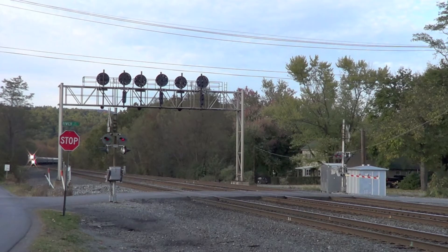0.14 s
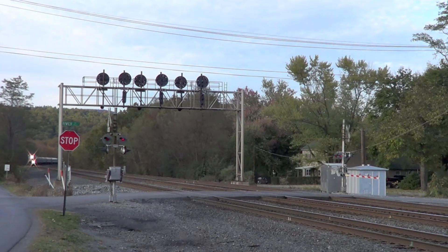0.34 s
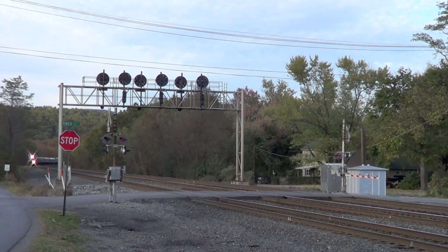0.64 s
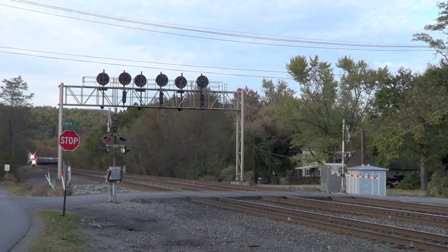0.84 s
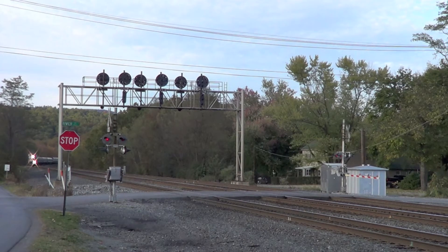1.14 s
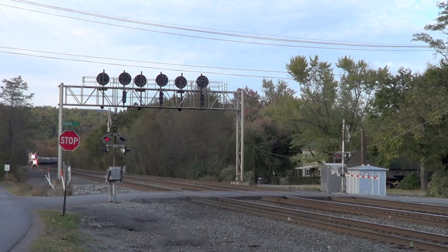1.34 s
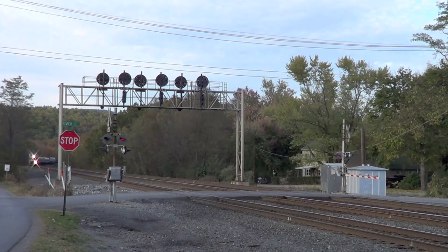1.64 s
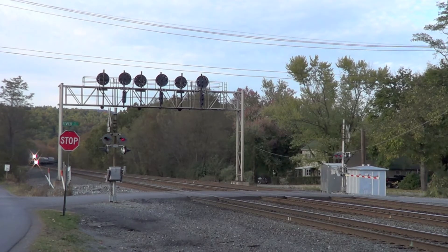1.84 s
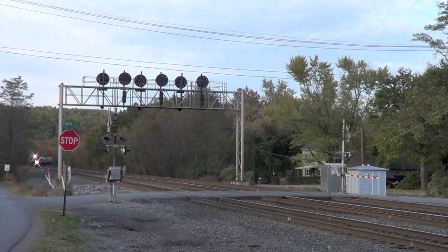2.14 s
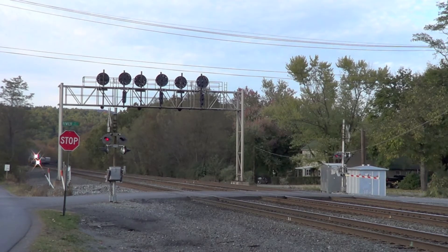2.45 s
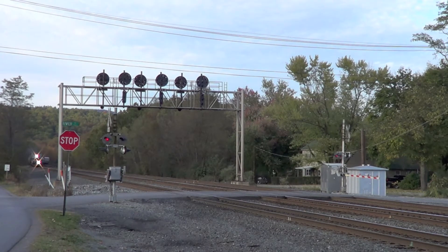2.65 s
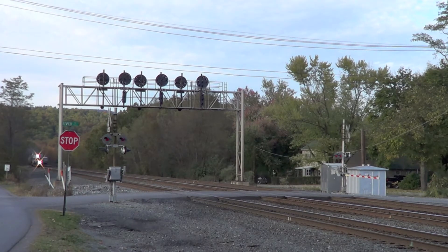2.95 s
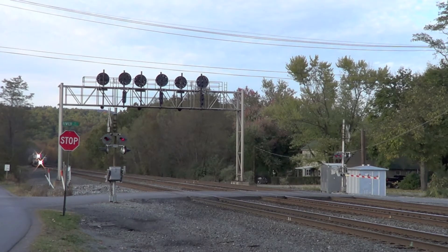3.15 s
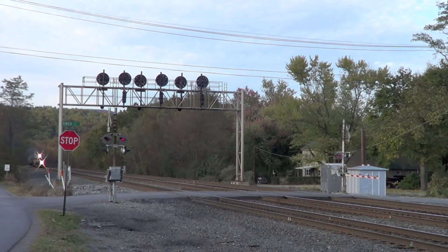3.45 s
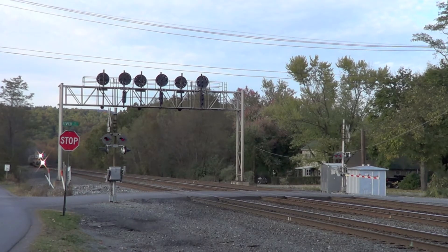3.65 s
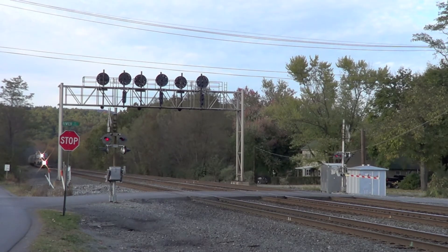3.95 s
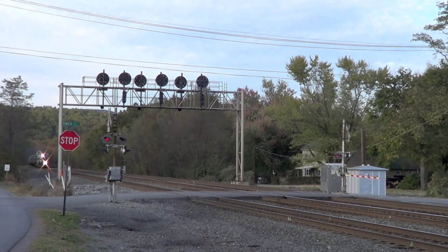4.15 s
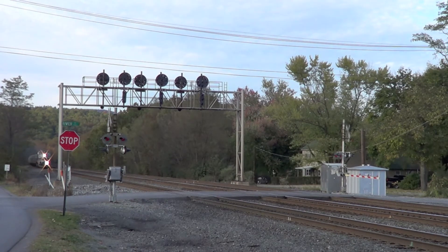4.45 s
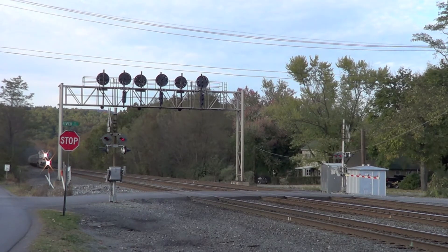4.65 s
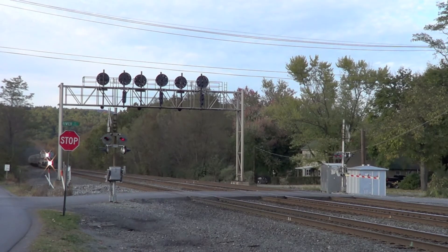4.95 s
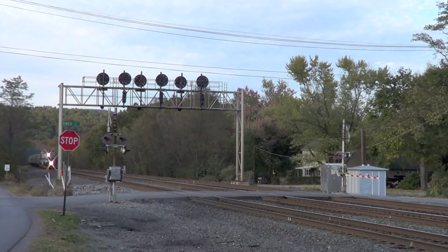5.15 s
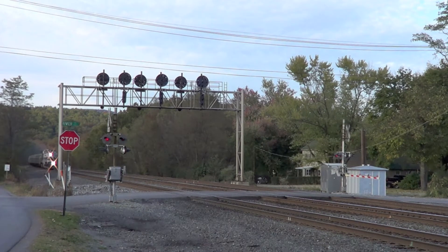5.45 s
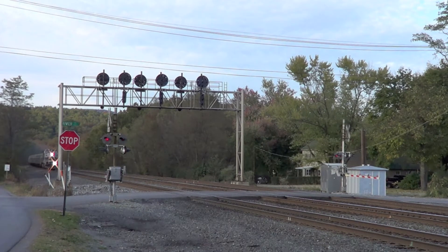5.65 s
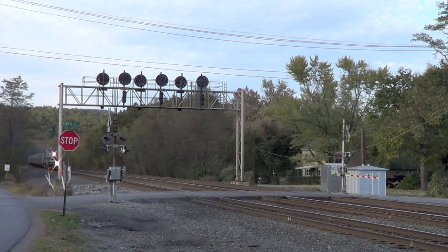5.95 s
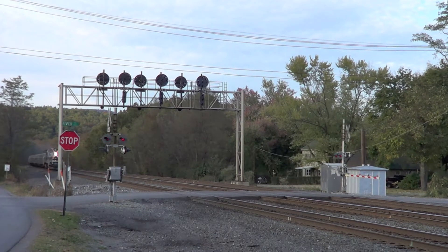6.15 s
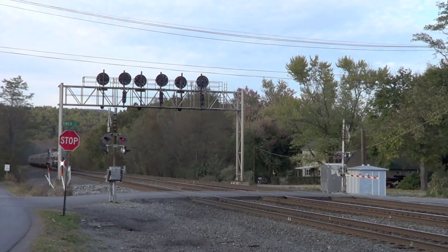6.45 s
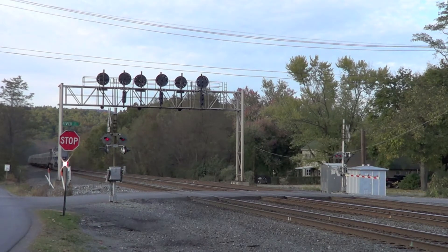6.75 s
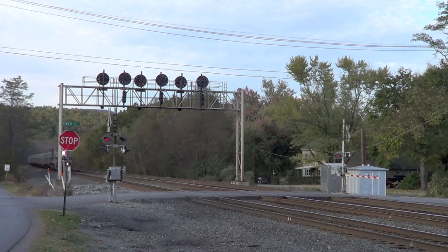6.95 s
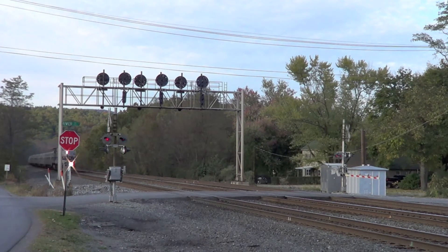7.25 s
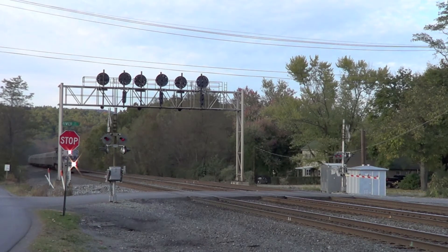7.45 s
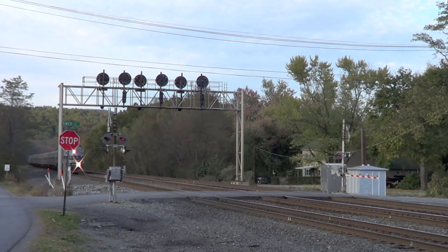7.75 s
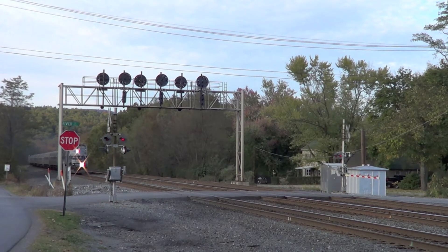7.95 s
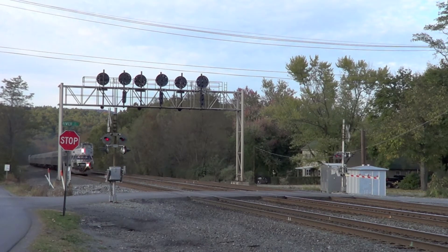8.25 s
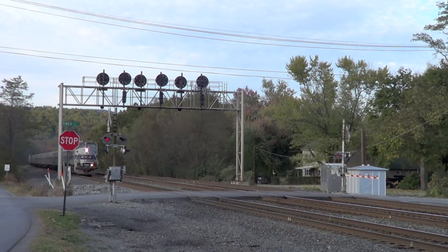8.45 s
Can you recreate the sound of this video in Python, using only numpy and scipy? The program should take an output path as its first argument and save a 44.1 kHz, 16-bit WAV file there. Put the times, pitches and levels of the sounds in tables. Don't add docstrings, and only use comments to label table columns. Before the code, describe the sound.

A diesel locomotive's throbbing low drone swells steadily at a rural crossing, rails hissing faintly, until a chordal horn bursts in at the very end.

```python
import sys
import numpy as np
from scipy import signal
from scipy.fft import rfft, irfft, next_fast_len
from scipy.io import wavfile
from scipy.ndimage import uniform_filter1d

SR = 44100
rng = np.random.default_rng(int(sys.argv[2]) if len(sys.argv) > 2 else 0)


def ratio(d):
    e = np.asarray(d, float) / 20
    return 10 ** e


def wrap_up_sound(samples):
    columns = np.atleast_2d(samples).T
    tamed = np.clip(columns, -1, 1)
    steps = np.round(tamed * 32767).astype(np.int16)
    wavfile.write(sys.argv[1], SR, steps)


N = 378819
T = np.arange(N) / SR
SIZE = next_fast_len(N + SR // 2)
HZ = np.maximum(np.arange(SIZE // 2 + 1) * SR / SIZE, 1)


def set_level(x, db):
    return x * ratio(db) / np.sqrt(np.mean(x ** 2))


def curve(table):
    s, values = np.transpose(table)
    return np.interp(T, s, values)


def along(table, hz):
    f, values = np.transpose(table)
    return np.interp(np.log(hz), np.log(f), values)


def ring(x, hz, width_hz):
    return signal.lfilter(*signal.iirpeak(hz, hz / width_hz, SR), x)


def steep_ring(x, hz, width_hz):
    return ring(ring(x, hz, width_hz), hz, width_hz)


def burst(x, s, length, db, hz, width_hz):
    out = np.zeros(x.shape)
    part = slice(max(int((s - 3 * length) * SR), 0), int((s + 3 * length) * SR))
    swell = np.exp(-((T[part] - s) / length) ** 2)
    out[..., part] = set_level(steep_ring(x[..., part], hz, width_hz), db) * swell
    return out


def walk(rate, t=T):
    steps = rng.standard_normal(int((t[-1] - t[0]) * rate) + 3)
    steps = uniform_filter1d(steps, size=2)
    return 1.62 * np.interp((t - t[0]) * rate, np.arange(len(steps)), steps)


def wash(colour, db, flicker_db, move):
    # (frequency [Hz], side share [0-1])
    spread = [(25, 0.7), (60, 0.5), (300, 0.61), (700, 0.49), (1500, 0.34), (3000, 0.19), (5000, 0.65),
              (9000, 0.49), (10500, 0.2), (12000, 0.05)]
    hz, s, noise = signal.stft(rng.standard_normal((2, N)), SR, nperseg=4096)
    hz = np.maximum(hz, 1)
    at = np.minimum(s * SR, N - 1).astype(int)
    shape = ratio(along(colour, hz)) * (hz > colour[0][0]) * (hz < colour[-1][0])
    shape = shape / np.sqrt(np.mean(shape ** 2))
    centres = 2 ** np.arange(4, 14.6, .5)
    window = np.clip(1 - 2 * abs(np.log2(hz[:, None] / centres)), 0, 1)
    swell_db = window @ np.array([flicker_db * walk(6.6, s) + move(f)[at] for f in centres])
    mid, side = noise * shape[:, None] * ratio(db + swell_db)
    side = side * np.clip(along(spread, hz), 0, 1)[:, None]
    return signal.istft(np.array([mid + side, mid - side]), SR, nperseg=4096)[1][:, :N]


def camcorder(scatter_db=4, late=.5, hum=0.31):
    # (frequency [Hz], width [Hz], level [dB])
    buzz = [(4070, 200, -68), (6740, 830, -70), (10370, 250, -74.5), (12360, 1100, -64)]
    # (frequency [Hz], level [dB])
    whine = [(15734.3, -64), (15747.4, -69), (7882, -79)]
    field = T * 59.94 + late
    spit_size = ratio(scatter_db * rng.uniform(-1.8, 2.1, int(field[-1]) + 1))[field.astype(int)]
    first = np.exp(-((field % 1 - .03) / 0.046) ** 2)
    second = .5 * np.exp(-((field % 1 - .23) / .04) ** 2)
    spit = (spit_size * (first + second) + hum) * rng.standard_normal(N)
    out = sum(set_level(steep_ring(spit, hz, width), db) for hz, width, db in buzz)
    blank = 1 - .35 * (field % 1 > .9)
    return out + blank * sum(np.sqrt(2) * ratio(db) * np.sin(2 * np.pi * hz * T) for hz, db in whine)


def wind(low_hz=38, top_hz=190):
    # (time [s], length [s], level [dB], centre [Hz])
    puffs = [
        (3.5, 0.065, -32, 55),
        (3.95, .08, -40, 50),
        (4.067, 0.048, -27.5, 80),
        (4.28, 0.026, -23, 100),
        (5.58, .08, -31, 65),
        (6.38, 0.078, -35, 55),
        (6.6, 0.11, -28, 70),
        (6.8, .07, -29, 85),
        (7.65, .08, -36, 50),
        (8.15, .08, -35, 55),
    ]
    band = signal.butter(3, [low_hz, top_hz], "band", fs=SR, output="sos")
    swirl = signal.sosfilt(band, rng.standard_normal((2, N)))
    left, right = sum(burst(swirl, s, length, db, hz, 2.8 * hz) for s, length, db, hz in puffs)
    return np.array([left, 0.54 * right - 1.0 * left])


def countryside():
    # (frequency [Hz], level [dB per Hz])
    field_colour = [(130, -40), (220, -13.5), (300, -7.5), (370, -8), (480, -7.5), (610, -0.5), (800, -3),
                    (1120, -6.5), (1600, -14), (3000, -23.5), (4300, -26), (5400, -29.5), (10900, -31),
                    (14000, -32.5), (15900, -27)]
    # (time [s], length [s], level [dB], pitch [Hz], chirp rate [per s])
    crickets = [
        (0.603, 1, -65, 3450, 19.2),
        (1.42, 0.2, -58, 3290, 24.3),
        (1.68, .08, -57.5, 3320, 20),
        (1.88, 0.26, -58, 3480, 13.3),
        (2.004, 0.43, -62, 3730, 16),
        (2.8, 0.73, -63, 3530, 18),
        (4.0, 0.41, -60, 3540, 15.7),
        (1.15, .25, -64, 4070, 19),
        (2.2, .3, -65, 4080, 20),
        (4.103, .2, -69, 4040, 19),
    ]
    # (time [s], length [s], level [dB], centre [Hz], width [Hz])
    rustles = [(0.044, 0.003, -45, 5900, 2000), (0.044, 0.0036, -42.5, 2140, 700),
               (0.042, 0.0022, -48, 8600, 1500), (0.06, 0.069, -52, 8900, 6000),
               (.16, 0.0018, -50, 5900, 2500), (.193, 0.0022, -50, 4000, 3000),
               (.24, .012, -54, 5000, 5000), (1.032, 0.17, -60, 7000, 7000),
               (1.65, 0.069, -56.5, 8500, 6000), (1.66, .04, -57, 4200, 2500),
               (1.978, .015, -57, 5000, 5000), (4.754, .008, -54, 9800, 2000),
               (5.54, .008, -70, 10500, 2000)]
    car_db = 5 * np.exp(-T / 2.4)
    traffic_db, leaves_db = -45.5 + car_db, -43.5 + 0.54 * car_db
    out = wash(field_colour, 0, 0.98, lambda hz: traffic_db if hz < 3000 else leaves_db)
    wing = rng.standard_normal((2, N))
    for s, length, db, hz, rate in crickets:
        strokes = 0.62 + np.cos(np.pi * rate * (T - s)) ** 4
        out = out + burst(wing * strokes, s, length, db, hz, 190)
    grit = rng.standard_normal(N) * ratio(2.6 * rng.exponential(size=N))
    return out + sum(burst(grit, *row) for row in rustles)


def horn(flutter_db=2.5, sag_hz=15, fall_db=-18, echo_db=-9, echo_s=.06, wide=.4):
    # (pitch [Hz], air arrives [s], rise [s], level [dB], second tone over the first [dB])
    bells = [
        (341, 8.405, 0.05, -22.5, -16),
        (412, 8.40, .17, -25, -4),
        (462, 8.47, 0.062, -21, -18),
        (560, 8.43, .09, -22.5, -14),
        (590, 8.43, 0.051, -28, -13),
        (652, 8.47, 0.098, -30, -15),
    ]
    third_db = -7
    speak = (1.4, 2.3, 0.49)
    count = SR // 4
    t, out = T[-count:], 0
    for hz, start, rise, bell_db, brass_db in bells:
        air = np.clip((t - start) / rise, 0, 1)
        phase = 2 * np.pi * np.cumsum(hz - sag_hz * (t - start) + 5 * walk(39.5, t)) / SR
        for k in range(1, 6):
            kind = min(k, 3) - 1
            db = bell_db + (0, brass_db, brass_db + third_db)[kind]
            db = db + fall_db * np.log2(max(k / 3, 1)) + flutter_db * walk(44.5, t)
            out = out + np.sqrt(2) * air ** speak[kind] * ratio(db) * np.sin(k * phase + 6 * rng.random())
    rasp = steep_ring(rng.standard_normal(count), 1700, 2400)
    out = out + air * set_level(rasp, -42.5)
    mid, side = rng.standard_normal((2, count)) * np.exp(-T[:count] / echo_s)
    tail = np.array([mid + wide * side, mid - wide * side]) / np.sqrt(np.sum(mid ** 2))
    heard = out + ratio(echo_db) * signal.fftconvolve(out[None], tail, axes=1)[:, :count]
    return np.pad(heard, ((0, 0), (N - count, 0)))


def machinery(near_db):
    # (frequency [Hz], level [dB per Hz])
    rumble_colour = [(22, -19), (35, -10.5), (60, -4.5), (100, -1), (150, -5), (220, -10.5), (290, -11),
                     (380, -15.5), (700, -24.5)]
    # (frequency [Hz], level [dB per Hz])
    roar_colour = [(180, -25), (300, 0), (318, -11), (356, -5.5), (515, -6), (647, -4.5), (1130, -10.5),
                   (1340, -8.5), (2230, -8.5), (3520, -18), (4360, -27.5), (6040, -31.5), (9000, -50),
                   (11700, -80), (19800, -120)]
    # (time [s], length [s], level [dB], pitch [Hz], width [Hz])
    rails = [
        (6.04, .05, -48, 2200, 400),
        (6.42, 0.2, -44, 1920, 110),
        (6.45, 0.15, -44.5, 2354, 220),
        (6.36, .09, -46, 2700, 900),
        (6.75, 0.099, -46, 1930, 130),
        (6.9, .04, -50, 2350, 150),
        (5.43, .3, -49, 1930, 640),
        (4.15, .15, -53, 2200, 1100),
    ]
    left_s = T[-1] - T
    trees_db = 5.5 * np.clip((4.65 - T) / 2.17, 0, 1)
    bush_db = 1 * (T < 5.8)
    roar_db = -36.5 - 2.0 * left_s - trees_db - bush_db
    top_db = np.maximum(2.5 - 1.5 * left_s, -2.5)

    def reach(hz):
        treble_db = top_db * np.clip(np.log2(hz / 2500), 0, 2)
        return roar_db + treble_db + (roar_db + 43.0) * 0.23 * np.log2(hz / 2000)

    rumble = wash(rumble_colour, -16, 1.55, lambda hz: -20 + 0.63 * (near_db + 20))
    scrub = rng.standard_normal(N)
    return rumble + wash(roar_colour, 3.2, 0.59, reach) + sum(burst(scrub, *row) for row in rails)


def exhaust(near_db, bark_db, usual_db=-20.5, usual_bark_db=-16.5, scatter_db=.45, jitter_s=.00006):
    # (time [s], firing rate [per s])
    firing = [(0.0, 98.43), (1.5, 96.59), (3.0, 96.87), (4.5, 96.46), (6.0, 96.15), (7.3, 96.27),
              (8.59, 95.9)]
    # (blow [dB], lag [crank degrees])
    cylinders = [(-2.8, -12.1), (-6.4, -23.5), (-2.6, -7.2), (3.9, -19.9), (-1.1, -18.0), (4.5, -12.9),
                 (1.3, -2.0), (5.9, -19.0), (-2.1, -6.5), (-3.4, -10.0), (-2.0, -2.8), (4.8, -22.9)]
    # (frequency [Hz], width [Hz], level [dB])
    stack = [(43.6, 8.0, -5.5), (64.8, 8.0, -21.5), (89.3, 21.5, -1.1), (108.0, 9.6, 6.2),
             (144.8, 8.0, -26.1), (188.5, 21.4, -9.9), (211.6, 8.0, -2.4), (237.4, 8.0, -18.1),
             (281.9, 8.0, -22.9)]
    # (frequency [Hz], dB per dB)
    growth = [(48, 0.56), (96, 1.12), (140, 1.02), (190, 1.0), (220, 1.15), (290, 1.1)]
    count, early = len(cylinders), SR // 4
    rate = np.r_[np.full(early, firing[0][1]), curve(firing)]
    turn = (np.cumsum(rate) - early * rate[0]) / SR
    nth = np.arange(int(turn[0]) + 1, int(turn[-1]))
    blow_db, lag = np.array(cylinders)[nth % count].T
    late, strong = rng.standard_normal((2, len(nth)))
    at = np.interp(nth + lag * count / 720, turn, np.arange(N + early)) + jitter_s * SR * late
    pulses = np.bincount(at.astype(int), ratio(blow_db + scatter_db * strong), N + early)
    pulses = pulses - pulses.mean()
    steady = [(-1) ** k * ratio(db) * ring(pulses, hz, width)[early:early + N]
              for k, (hz, width, db) in enumerate(stack)]
    out = 0
    for mode, (hz, _, _) in zip(steady, stack):
        gain_db = along(growth, hz) * (near_db - usual_db)
        gain_db = gain_db + (bark_db - usual_bark_db) * (hz > 170)
        out = out + mode * ratio(gain_db + .5 * walk(2.976))
    return out * ratio(usual_db) / np.std(sum(steady))


def scene():
    # (time [s], level [dB])
    near = [(0, -31.5), (1.24, -29), (2.32, -24.5), (2.44, -25.5), (2.65, -22.5), (3.04, -25), (3.8, -22),
            (4.38, -23.5), (4.86, -20), (5.53, -18.5), (5.72, -19.5), (6.22, -16.5), (6.9, -15.5),
            (7.23, -17), (7.39, -14), (7.61, -16), (7.75, -13.5), (8.59, -16)]
    # (frequency [Hz], lag of the left [radians])
    port_lag = [(50, .12), (90, .42), (340, .42), (1000, .1), (3500, 0), (16000, 0)]
    # (frequency [Hz], left minus right [dB])
    port_db = [(50, .7), (100, 1.2), (340, 1.6), (600, 1.2), (3000, 1.9), (5000, .2), (10000, 0)]
    near_db = curve(near)
    bark_db = -15.0 + uniform_filter1d(near_db, 2 * SR) - near_db
    air = countryside() + horn() + machinery(near_db) + exhaust(near_db, bark_db)
    air = np.pad(air, ((0, 0), (0, SR // 4)), "reflect")
    port = ratio(along(port_db, HZ) / 2) * np.exp(-.5j * along(port_lag, HZ))
    bass = 1 / np.sqrt(1 + (31 / HZ) ** 8)
    heard = irfft(rfft(air, SIZE) * bass * np.array([port, 1 / port]), SIZE)[:, :N]
    return heard + wind() + camcorder()


def band_limit(x):
    return signal.sosfilt(signal.butter(12, 16310, fs=SR, output="sos"), x)


def record(dry):
    top_cut = signal.ellip(10, .3, 60, 15790, fs=SR, output="sos")
    return band_limit(signal.sosfilt(top_cut, dry))


dry = scene()
out = record(dry)
wrap_up_sound(out)
```